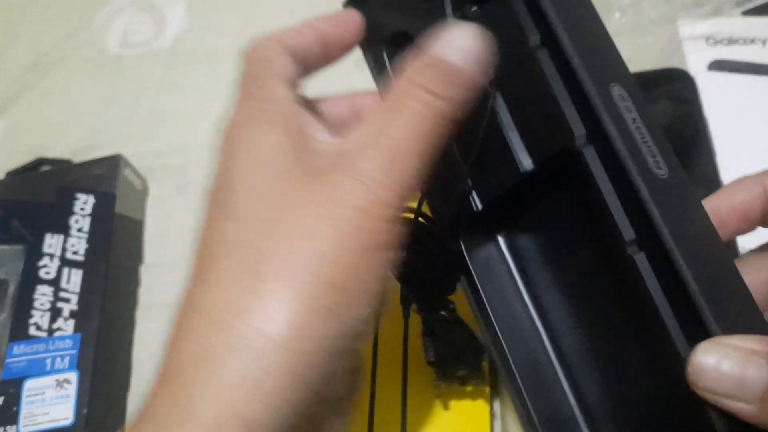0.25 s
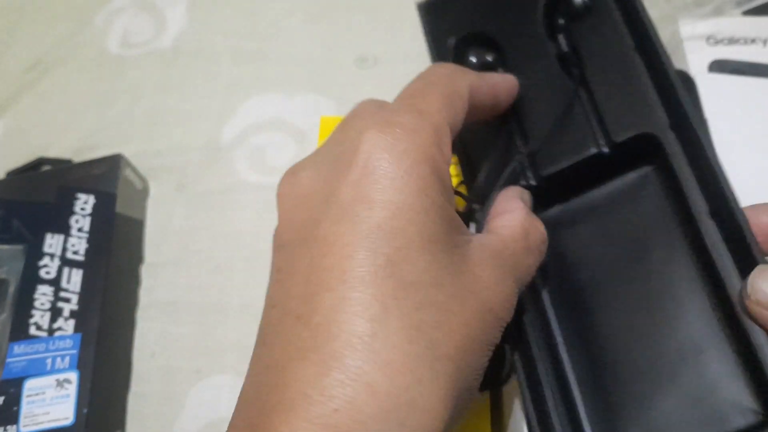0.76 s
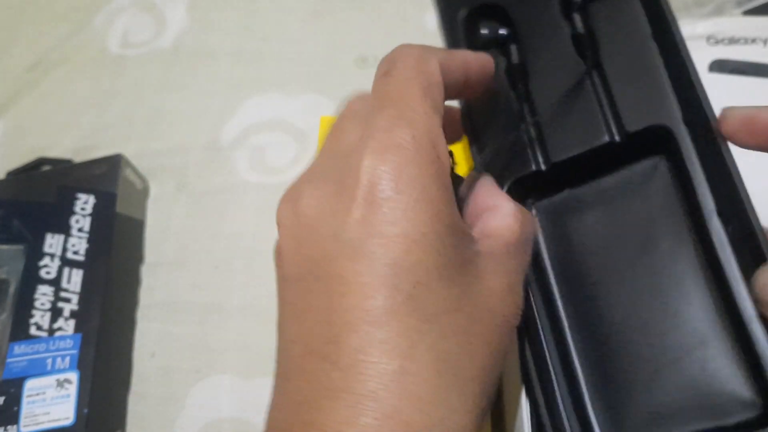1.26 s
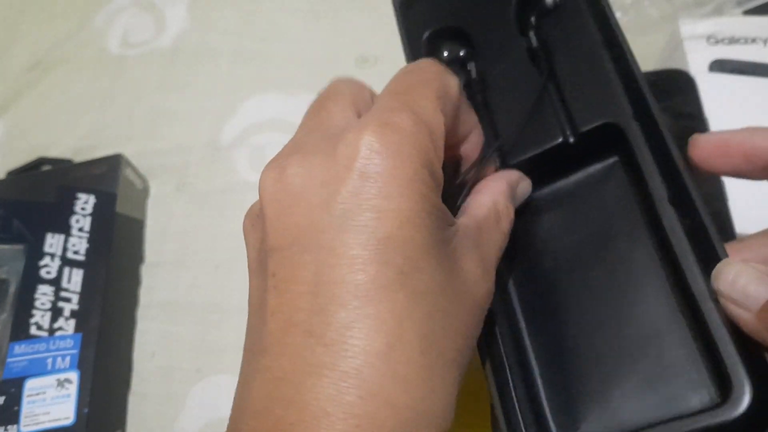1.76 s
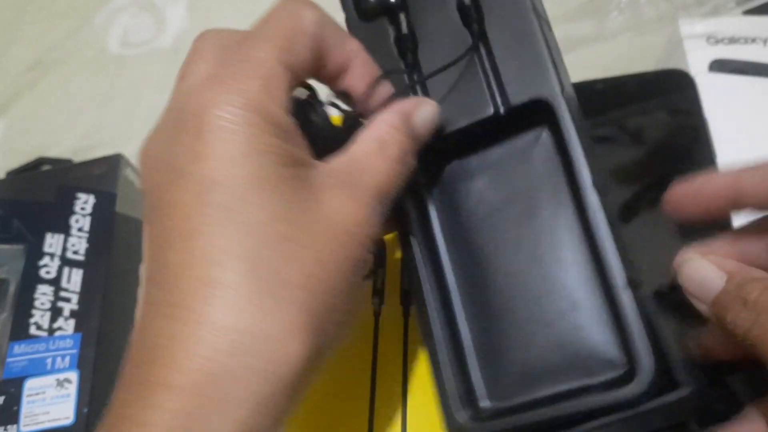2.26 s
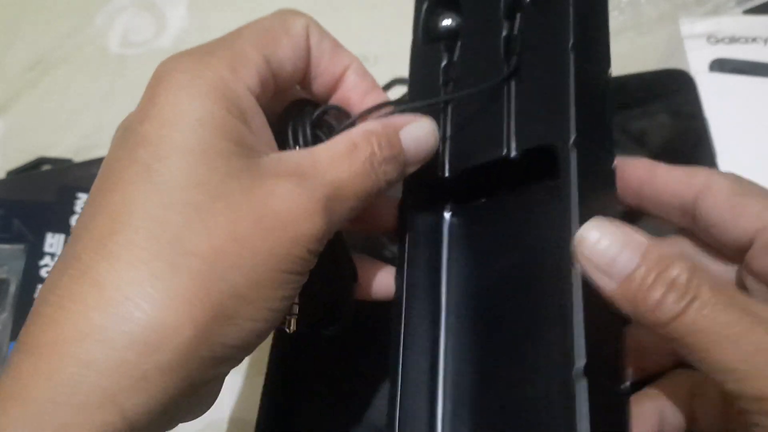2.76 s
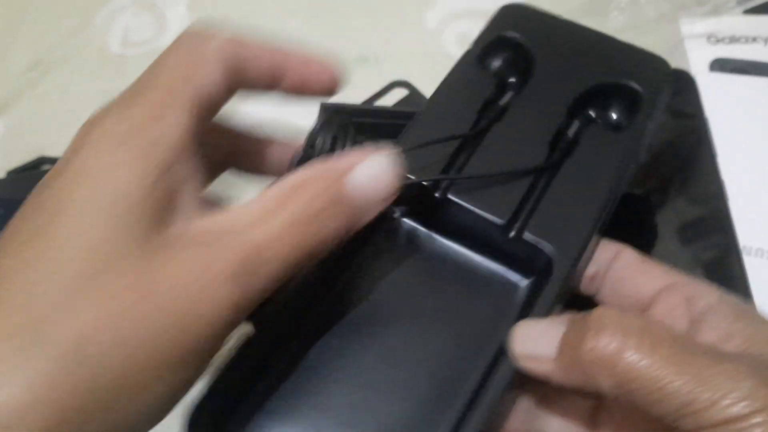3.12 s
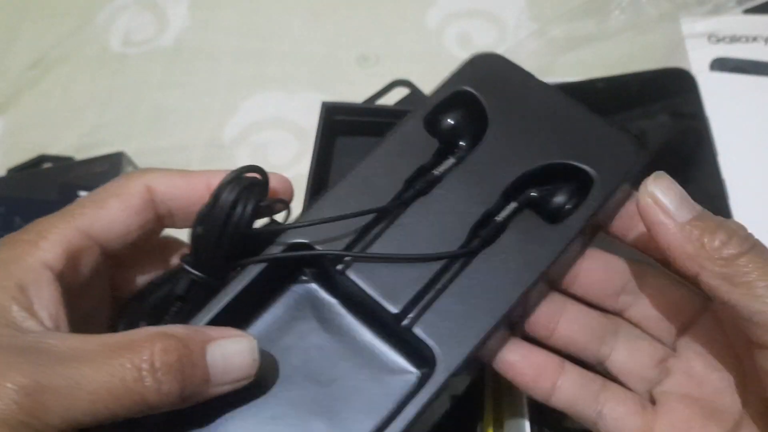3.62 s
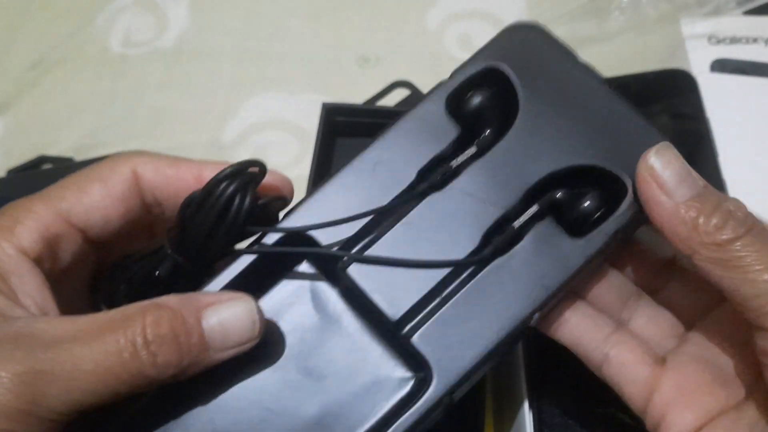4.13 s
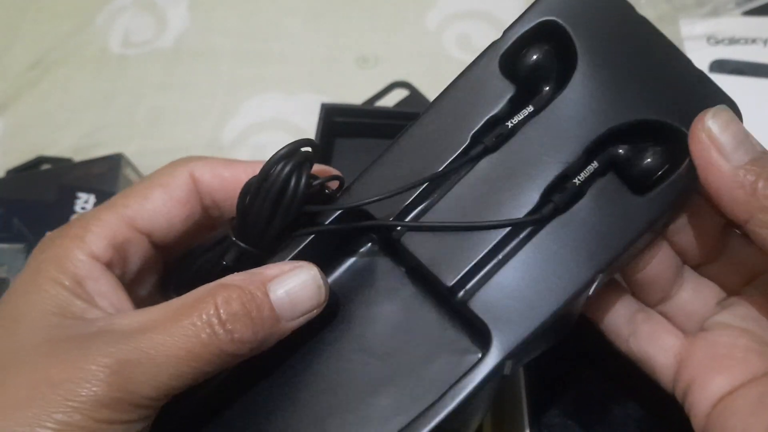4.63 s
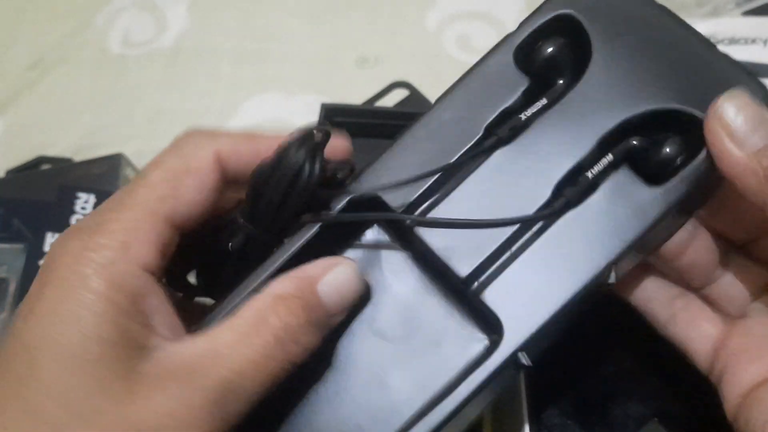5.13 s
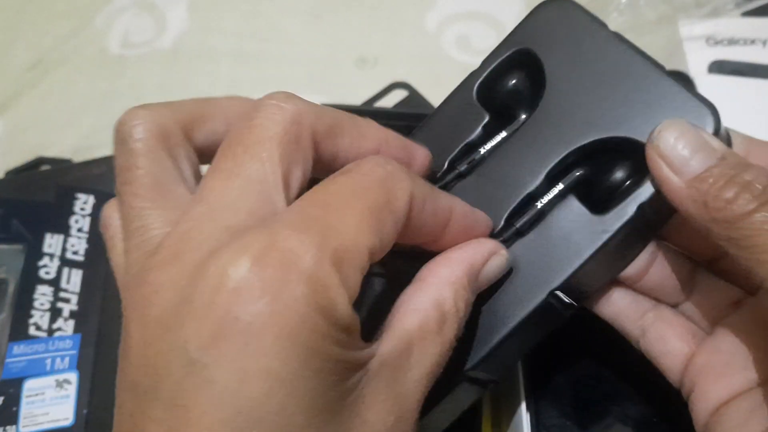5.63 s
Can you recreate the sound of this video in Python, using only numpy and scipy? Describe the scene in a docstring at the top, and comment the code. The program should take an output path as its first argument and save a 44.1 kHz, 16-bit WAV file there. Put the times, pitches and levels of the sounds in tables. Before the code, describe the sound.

Fingers and thin cable rub a hollow plastic insert above a box on a table. Light scuffs lead to a loud pop, a deeper thump, then a busy run of creaks, clicks and hollow knocks in the middle. After a sparse pause, one hard plastic snap sounds late, followed by fading small scrapes. Close stereo pickup, left of centre, very short room echo, faint steady background noise.

```python
"""Skin and cable rub a thin moulded plastic tray, which pops and snaps as two hands turn it above a cardboard box.
Rubbing is stick-slip noise ringing panel, ribs and box, with skin rasp and hiss on top; the panels ring
near 1 and 1.8 kHz. Pops and knocks are short rough pushes into the same resonances; the box booms under them.
Soft low thuds come through the table; a short room echo of the pops and faint steady noise lie behind."""
import sys
import numpy as np
from scipy import signal
from scipy.fft import rfft, irfft, next_fast_len
from scipy.io import wavfile
from scipy.ndimage import uniform_filter1d, map_coordinates

SR = 44100
rng = np.random.default_rng(int(sys.argv[2]) if len(sys.argv) > 2 else 0)


def wrap_up_sound(samples):
    """Save the sound to the file named by the first command line argument, as 16-bit audio."""
    columns = np.atleast_2d(samples).T
    # keep every value between -1 and 1, then stretch to whole-number steps
    tamed = np.clip(columns, -1, 1)
    steps = np.round(tamed * 32767).astype(np.int16)
    wavfile.write(sys.argv[1], SR, steps)


N = 259308

# Resonances of the tray's broad panel, its ribs and the box. Each row: pitch in Hz, width in Hz, strength in dB.
PANEL_MODES = [(867.4, 133.2, -5.5), (1002.5, 91.8, 0), (1079.3, 140.3, -1.5), (1228, 168.5, -7.5)]
RIB_MODES = [(1430, 209.6, -3.5), (1689.7, 102.2, -4), (1792.4, 170.4, -6), (2280.6, 307.7, -3.5),
             (2477.3, 837, -6.5)]
BOX_MODES = [(148, 46, -4), (299.1, 49.7, 5), (389.2, 73, 1), (494.5, 99, -0.5)]
# Where the tray is held. Each row: time in seconds, left over right in dB.
HAND_POSITIONS = [(0, 6.5), (.8, 3), (2.1, 2), (2.7, 4.5), (3.6, 5), (4.4, 8), (4.9, 7.5), (5.2, 6),
                  (5.88, 6.5)]


def amp(db):
    """Gain of a level in dB."""
    return 10 ** (np.asarray(db) / 20)


def unit(x):
    """Scale to rms 1."""
    return x / np.sqrt(np.mean(x ** 2) + 1e-20)


def peak_unit(x):
    """Scale so that the mean of the channels peaks at 1."""
    return x / np.max(np.abs(x.mean(axis=0)))


def along(points, hz):
    """Interpolate (Hz, value) points on a log frequency axis."""
    point_hz, values = np.transpose(points)
    return np.interp(np.log(hz + 1), np.log(point_hz + 1), values)


def filtered(x, response):
    """Multiply the spectrum of x by a complex response of frequency."""
    size = next_fast_len(x.shape[-1] + 8192)  # padding for the ringing
    spectrum = rfft(x, size) * response(np.fft.rfftfreq(size, 1 / SR))
    return irfft(spectrum, size)[..., :x.shape[-1]]


def colour(spectrum):
    """Gain of a (Hz, dB) spectrum."""
    return lambda hz: amp(along(spectrum, hz))


def sides(pan_db):
    """Gains of left and right for a left-over-right level in dB."""
    return amp(np.array([pan_db / 2, -pan_db / 2]).reshape(2, -1))


def modes(body, low_hz, high_hz, scatter_db=0, favoured_hz=0, lean_db=0):
    """Causal response of a body: band-limited resonances, scattered in strength and leaning to a favoured pitch."""
    hz, width_hz, db = np.transpose(body)[..., None]
    db = db + scatter_db * rng.standard_normal(db.shape)
    if favoured_hz:
        octaves_off = np.abs(np.log2(hz / favoured_hz))
        db = db - lean_db * np.tanh(7 * octaves_off)
    sign = (-1) ** np.arange(len(body))[:, None]
    edges = signal.butter(2, [low_hz, high_hz], "band", analog=True)

    def response(f):
        resonances = 1j * f * width_hz / (hz ** 2 - f ** 2 + 1j * f * width_hz)
        return signal.freqs(*edges, f)[1] * np.sum(sign * amp(db) * resonances, axis=0)

    return response


def ports(pair, lag_ms):
    """Two unrelated forces mixed to a left-right likeness that falls with frequency; left hears first by lag_ms."""
    # Left-right likeness. Each row: frequency in Hz, correlation from 0 to 1.
    likeness = [(100, .95), (500, .94), (1200, .92), (2500, .7), (5000, .45), (15000, .3)]

    def mix(hz):
        angle = np.arccos(np.clip(along(likeness, hz), 0, 1)) / 2
        return np.array([np.cos(angle), np.sin(angle)])

    def lead(hz):
        return np.exp(1j * np.pi * hz * lag_ms / 1000 * np.array([[1], [-1]]))

    mid, side = filtered(pair, mix)
    return filtered(np.array([mid + side, mid - side]), lead)


def pops():
    """Each buckling or knock is a short rough push that rings panel, ribs and box at new strengths."""
    # Each row: start in seconds, peaks of panel, ribs, crack and box in dB, contact in ms,
    # favoured pitches of panel, ribs and box in Hz.
    pop_rows = [(.077, -57.5, -58.5, -80.5, -49.5, 3.5, 888, 1800, 321.2),
                (.406, -45.5, -59.5, -67.5, -59.5, 3.4, 925, 1410, 536),
                (.508, -40, -50.5, -44.5, -60, 3.77, 873, 1570, 558),
                (.734, -50, -61, -52.5, -72.5, 8.5, 1000, 1340, 291),
                (0.768, -48.5, -58.5, -44, -81, 8.1, 1056, 2200, 315),
                (1, -50, -57, -70.5, -81.5, 5.6, 1062, 1367, 143),
                (1.281, -43, -50, -63, -63, 3.9, 905, 1330, 509),
                (1.307, -22.5, -33, -28, -36.5, 9, 847.2, 1746, 495),
                (1.322, -35, -40.5, -40, -50, 5.8, 900, 1450, 400),
                (1.387, -38.5, -37, -45.5, -59.5, 6.84, 870, 1765, 482),
                (1.708, -48.5, -46, -56, -71.5, 8, 1100, 1572, 560),
                (1.81, -40.5, -42.5, -46, -72, 7.5, 1099, 1300, 452),
                (1.85, -44.5, -44, -62.5, -82.5, 3.4, 960, 1350, 546),
                (1.953, -33.5, -36.5, -61.5, -54.5, 14, 988, 1335, 549),
                (2.008, -24, -23.5, -30.5, -19.5, 2.36, 870, 1296, 428),
                (2.064, -40, -43.5, -60.5, -64.5, 7.3, 1200, 1360, 164),
                (2.191, -37, -30.5, -36, -59.5, 3.2, 1062, 1910, 299),
                (2.276, -39, -43, -57, -71.5, 3.8, 1230, 1805, 307),
                (2.326, -40.5, -47.5, -52, -46, 4, 875, 1360, 476),
                (2.573, -42.5, -42, -55.5, -56, 3.6, 952, 1800, 283),
                (2.602, -36.5, -34, -43, -38, 4.8, 864.7, 1733, 292),
                (2.658, -32, -36.5, -32.5, -53.5, 5.5, 903, 1720, 272),
                (2.675, -33, -26, -23.5, -37.5, 5.47, 977, 1834, 500),
                (2.71, -42, -37.5, -43.5, -39, 4, 1120, 1350, 395.5),
                (2.728, -48, -50, -42.5, -43.5, 3.6, 1000, 1700, 300),
                (2.742, -34, -21.5, -31.5, -24.5, 4.48, 866, 1604, 331.5),
                (2.756, -52, -52, -41.5, -36, 5.3, 845, 1510, 165),
                (2.795, -29, -32.5, -43, -32.5, 2.2, 892, 1536, 514.6),
                (2.852, -58.5, -53.5, -65.5, -47, 4, 877, 1618, 326),
                (2.905, -47, -45, -44.5, -50.5, 4.45, 1010, 1870, 490),
                (3.095, -26, -23, -16.5, -68, 3.8, 1225, 1796, 310),
                (3.128, -43.5, -34, -44.5, -47.5, 5.2, 1170, 1800, 277),
                (3.146, -33, -48.5, -33.5, -43.5, 6.15, 1250, 1500, 334.3),
                (3.177, -34.5, -34, -30.5, -55.5, 9.74, 1134, 1915, 274),
                (3.285, -51.5, -48.5, -54.5, -70, 2.5, 930, 1520, 390),
                (3.359, -49, -38, -37, -76.5, 4.36, 1152, 1828, 326),
                (3.479, -27, -42, -29, -62.5, 5.4, 1163, 1370, 560),
                (3.487, -36, -37, -52.5, -52.5, 3.85, 1136, 1440, 322),
                (3.534, -37, -55, -44.5, -59.5, 3.2, 1183, 1810, 441),
                (3.81, -45.5, -46, -46.5, -61.5, 3.4, 981, 1490, 396),
                (3.863, -38, -37.5, -52.5, -55, 1.95, 1185, 1800, 289),
                (4.098, -47.5, -49, -60, -57, 14.5, 1096, 1410, 340),
                (4.193, -54.5, -51.5, -46.5, -80.5, 10, 1080, 2196, 336.6),
                (4.313, -51, -66, -67, -71.5, 4, 1056, 1350, 312),
                (4.471, -55.5, -59, -76, -76, 4, 1010, 1400, 150.5),
                (4.835, -21, -18.5, -57, -31, 2.93, 1082, 1442, 274),
                (4.84, -20.5, -17.5, -36, -51.5, 2.9, 1020, 1470, 210),
                (4.851, -39, -32.5, -60.5, -62, 4.85, 1280, 1377, 443.4),
                (5.042, -52.5, -57, -66.5, -76, 4.7, 1066, 1451, 471),
                (5.085, -41, -48.5, -51.5, -78, 12, 986.5, 1587, 320.8),
                (5.182, -56.5, -55, -65.5, -77, 4.2, 1020, 2010, 318),
                (5.212, -45, -48.5, -46.5, -70, 5.45, 970, 1460, 560),
                (5.224, -33, -41, -50, -67, 2.23, 1177, 1431, 296.6),
                (5.281, -49, -61, -65, -84, 4.33, 1230, 1370, 320.5),
                (5.361, -43, -42, -42.5, -62, 8.95, 1117, 1488, 338),
                (5.396, -47.5, -40.5, -41, -49.5, 16.8, 1230, 1478, 304),
                (5.419, -64, -45.5, -44, -54.5, 11, 1190, 1607, 302.7),
                (5.521, -61, -59.5, -68, -83, 5.5, 1179, 1538, 145),
                (5.566, -61.5, -45.5, -56, -66, 5.2, 1310, 1463, 317),
                (5.715, -55.5, -50, -76.5, -56.5, 13.8, 1080, 1460, 262),
                (5.829, -58, -47, -53.5, -77.5, 5.03, 1026, 1507, 301.3)]
    # Colour of the crack. Each row: frequency in Hz, density in dB per Hz.
    crack_colour = [(1650, -47), (2800, -10.5), (3480, 0.5), (4000, -4), (4500, -0.5), (5050, -4.5),
                    (9260, -15.5), (12200, -14), (16000, -29.5)]
    extra_pan_db = 2  # further to the left than the rubbing
    out, t = np.zeros((2, N + SR)), np.arange(SR // 10) / SR
    for start_s, panel_db, ribs_db, crack_db, box_db, contact_ms, panel_hz, ribs_hz, box_hz in pop_rows:
        pan_db = np.interp(start_s, *np.transpose(HAND_POSITIONS)) + extra_pan_db
        contact_s = np.clip(contact_ms, .3, 30) / 1000
        # a hard first touch on top of a rough push while the wall buckles
        envelope = np.exp(-(t / contact_s) ** 1.455) + 3 * np.exp(-t / 0.000186)
        push = ports(envelope * rng.standard_normal((2, len(t))), lag_ms=0.0745)

        panel = filtered(push, modes(PANEL_MODES, 700, 1900, 3.0, panel_hz, lean_db=16.0))
        ribs = filtered(push, modes(RIB_MODES, 1250, 3200, 2.1, ribs_hz, lean_db=15))
        crack = filtered(push * np.exp(-t / 0.058), colour(crack_colour))
        # long waves reach both ports alike: one channel
        box = filtered(push[:1], modes(BOX_MODES, 120, 700, 3.44, box_hz, lean_db=15.5))

        tray = amp(panel_db) * peak_unit(panel) + amp(ribs_db) * peak_unit(ribs)
        tray += amp(crack_db) * peak_unit(crack)
        boom = amp(box_db) * peak_unit(box)
        out[:, round(start_s * SR):][:, :len(t)] += sides(pan_db) * tray + sides(0.5 * pan_db) * boom
    return out[:, :N]


def rubbing():
    """One sliding force rings panel, ribs and box; a second one makes the skin's rasp and hiss."""
    # Colours of the skin. Each row: frequency in Hz, density in dB per Hz.
    rasp_colour = [(1590, -40.5), (2700, -9.5), (3570, -0.5), (4240, -0.5), (4650, -1.5), (4990, -3),
                   (5470, -5), (6500, -14.5), (8450, -26.5), (14300, -120)]
    hiss_colour = [(3820, -15.5), (6500, -3), (8400, -4.5), (13400, -3.5), (15500, -11.5), (16000, -50.5)]
    on_panel, on_ribs, on_rasp, on_hiss, on_box = strokes()
    pan_db = np.interp(np.arange(N) / SR, *np.transpose(HAND_POSITIONS))

    force = ports(friction(ticks_db=2, swell_db=2.02, patchy_db=3.0), lag_ms=0.063)
    panel = on_panel * unit(filtered(force, modes(PANEL_MODES, 570, 1540)))
    ribs = on_ribs * unit(filtered(force, modes(RIB_MODES, 1437.5, 2499)))
    box = on_box * unit(filtered(force, modes(BOX_MODES, 96, 630)))

    skin = ports(friction(ticks_db=2.0, swell_db=2.5, patchy_db=3.5), lag_ms=0.061)
    rasp = on_rasp * unit(filtered(skin, colour(rasp_colour)))
    hiss = on_hiss * unit(filtered(skin, colour(hiss_colour)))
    return sides(pan_db) * (panel + ribs + rasp + hiss) + sides(1.523 * pan_db) * box


def strokes():
    """Gains of panel, ribs, rasp, hiss and box: each stroke presses up to its peak, fades and lifts off."""
    # Each row: start, strongest and end in seconds, panel level in dB, fade until the end in dB,
    # then levels of ribs, rasp, hiss and box over the panel in dB.
    stroke_rows = [(0, -0, 0.0766, -64.5, 17.5, 0.5, -7.5, -5.5, -5),
                   (0.081, .174, 0.2215, -67, 7.5, 7.5, -6, 6.5, -5.5),
                   (0.169, 0.473, 0.5618, -54.5, 10, -2.5, -9, -4.5, -15.5),
                   (0.567, 0.642, 0.7005, -59.5, 8.5, 0.5, -1, 5.5, -15),
                   (0.7, .75, 0.865, -50.5, 6, -3.5, -7.5, -7, -26),
                   (0.854, 0.888, 0.9383, -49, 11, -5.5, -9.5, -12.5, -21),
                   (.94, .95, 0.994, -77, 3, -5.5, -11.5, -12, -3),
                   (.997, 0.99, 1.201, -62.5, 0.5, -9, -17, -21.5, -18),
                   (1.168, 1.222, 1.3035, -53, -1.5, -6.5, -17.5, -14, -27),
                   (1.285, 1.321, 1.4688, -44.5, 26, -3, -11, -8, -9.5),
                   (1.442, 1.467, 1.6364, -60.5, 11, 0, -9.5, -5.5, -14),
                   (1.637, 1.648, 1.87, -68, 0, -2, -8.5, -17.5, -12),
                   (1.706, 1.716, 1.758, -67.5, 4.5, 0, 5, 8, -7.5),
                   (1.829, 1.82, 1.854, -56, 2, -3.5, -9, -16.5, -25),
                   (1.876, 1.921, 2.0375, -44.5, 3, -2.5, -7.5, -9, -22),
                   (2.018, 2.011, 2.1694, -42.5, 16, -1.5, -12.5, -15, -12.5),
                   (2.142, 2.198, 2.2443, -44.5, 4.5, 0, -9, -13, -13.5),
                   (2.251, 2.278, 2.341, -49, 3, -1.5, -10.5, -13, -9),
                   (2.307, 2.324, 2.445, -51, 8.5, -3, -9, -14.5, 0.5),
                   (2.404, 2.484, 2.593, -56.5, 3.5, 1, -4, -1, -15.5),
                   (2.569, 2.585, 2.761, -42, 4, 0, -8.5, -9, -7),
                   (2.633, 2.674, 2.72, -41.5, 12, 1.5, -8.5, -2.5, -4.5),
                   (2.703, 2.743, 2.823, -50, 14.5, -2.5, -3, -1.5, 9.5),
                   (2.829, 2.876, 2.89, -61, 2, -5, -14.5, -15.5, -1.5),
                   (2.905, 2.913, 2.963, -52, 3, -1, -8, -8.5, 1),
                   (2.94, 2.986, 3.164, -64.5, 0, -0.5, -4, -2, -16),
                   (3.088, 3.096, 3.198, -40.5, 13.5, -0.5, -4.5, -9, -13.5),
                   (3.172, 3.179, 3.284, -52, 15.5, -2.5, -3.5, -11.5, -11),
                   (3.271, 3.28, 3.42, -61.5, 2.5, -0.5, -5.5, -12.5, -8),
                   (3.399, 3.531, 3.4955, -51.5, -7, -2, -2, -0.5, -10.5),
                   (3.51, 3.544, 3.7475, -50, 9.5, 1.5, 1, 3, -14),
                   (3.792, 3.831, 3.899, -48, 2.5, 0, -3, -5, -19.5),
                   (3.91, 4.009, 4.342, -59.5, 12, 0, -3, -5, -14.5),
                   (4.356, 4.485, 4.638, -66, 4.5, -6, -12.5, -11, -14),
                   (4.61, 4.648, 4.854, -66.5, 8, -0.5, -5, -6, -15.5),
                   (4.831, 4.857, 4.953, -48.5, 20, -2, -12.5, -18.5, -6),
                   (5.051, 5.1, 5.197, -55.5, 5, -2.5, -6, -11.5, -19),
                   (5.191, 5.226, 5.357, -53, 26.5, -2.5, -7.5, -6.5, -19),
                   (5.359, 5.364, 5.39, -56, 5.5, -2, -4, -12.5, -22.5),
                   (5.383, 5.41, 5.437, -56.5, 6, 0.5, -2, -6, -4.5),
                   (5.427, 5.449, 5.61, -76.5, 9, -1, -12.5, -8.5, 2.5),
                   (5.564, 5.57, 5.687, -70, 1.5, 9, -1.5, -0.5, -10.5),
                   (5.728, 5.729, 5.92, -65.5, 1.5, -2, -12, -13, -13)]
    # How steeply panel, ribs, rasp, hiss and box follow the force: one exponent a row.
    steepness = np.array([[1.01], [1.05], [1.2], [1.25], [.9]])
    touch = 0.13  # share of the force at first touch
    release_db_per_s = 699.5  # after lift-off, before steepness
    t, power = np.arange(N) / SR, np.zeros((5, N))
    for start_s, top_s, end_s, panel_db, fade_db, *over_db in stroke_rows:
        rise = np.interp(t, [start_s - .003, start_s, max(top_s, start_s + .001)], [0, touch, 1])
        fall_db = np.interp(t, [top_s, max(end_s, top_s + .001)], [0, fade_db])
        fall_db += release_db_per_s * np.maximum(t - end_s, 0)
        force = rise * amp(-fall_db)
        levels = amp(panel_db + np.array([0, *over_db]))[:, None]
        power += (levels * force ** steepness) ** 2
    return np.sqrt(power)


def friction(ticks_db, swell_db, patchy_db):
    """Stick-slip force: noise that jumps at each slip and sinks back, its strongest pitches drifting."""
    z = signal.stft(rng.standard_normal((2, N)), nperseg=512)[2]
    # random field smoothed over frequency, then time
    field = uniform_filter1d(rng.standard_normal(z.shape[1:]), size=3, axis=0)
    field = uniform_filter1d(field, size=12, axis=1)
    noise = signal.istft(z * amp(patchy_db * unit(field)), nperseg=512)[1][:, :N]
    slips = (rng.random(N) < 110 / SR) * rng.exponential(size=N)  # 110 a second on average
    jumps = signal.lfilter([1], [1, -np.exp(-1 / (0.0049 * SR))], slips)  # each sinks back in 4.9 ms
    return amp(ticks_db * np.minimum(jumps, 4) + swell_db * wobble(30)) * noise


def wobble(rate):
    """Smooth random curve with rate knots a second."""
    knots = rng.standard_normal(int(N * rate / SR) + 4)
    return map_coordinates(knots, [np.arange(N) * rate / SR])


def room(x):
    """Echo by convolution with noise in which each frequency dies at its own speed."""
    # Decay of the room. Each row: frequency in Hz, time to die by 60 dB in seconds.
    decay_times = [(200, 0.093), (1000, 0.049), (4000, 0.05), (12000, 0.055)]
    hz, t, z = signal.stft(rng.standard_normal((2, SR // 3)), SR, nperseg=256)
    decay_db = -60 * t / along(decay_times, hz)[:, None]
    tail = signal.istft(z * amp(decay_db), SR, nperseg=256)[1]
    delayed = np.pad(x, (200, 0))  # samples
    return signal.fftconvolve(delayed[None], tail / np.linalg.norm(tail[0]), axes=1)[:, :N]


def table():
    """Weight shifting on the table: low thuds, almost alike at both ports, swell and die over a steady rest."""
    # Each row: time of peak in seconds, peak level in dB, time to die by 20 dB in seconds.
    thud_rows = [(.47, -73.5, 0.25), (1.27, -65, 0.13), (1.32, -52, 0.0576), (2.04, -41.5, 0.0414),
                 (2.33, -59.5, 0.1631), (2.6, -67.5, .1), (2.72, -57, 0.083), (2.8, -46, 0.0513),
                 (2.92, -64.5, 0.01), (3.14, -71, 0.1), (3.42, -77.5, 0.01), (3.631, -75.5, 0.31),
                 (4.612, -57.5, 0.006), (4.849, -72, 0.02), (5.41, -73, 0.13), (5.73, -70.5, 0.09)]
    # Colour of a thud. Each row: frequency in Hz, density in dB per Hz.
    thud_colour = [(12, -21.5), (20, -11), (108, 1.5), (150, -7), (200, -21), (330, -120)]
    rise_over_decay, rest_db = .8, -78.5  # swell time over decay time; steady level
    t, level = np.arange(N) / SR, amp(rest_db)
    for peak_s, peak_db, decay_s in thud_rows:
        distance_s = np.maximum((peak_s - t) / rise_over_decay, t - peak_s)
        level = level + amp(peak_db - 20 * distance_s / decay_s)
    noise = rng.standard_normal(N) + .3 * rng.standard_normal((2, N))  # shared part + own part
    return level * unit(filtered(noise, colour(thud_colour)))


def air():
    """Faint steady coloured noise of room and microphone."""
    # Each row: frequency in Hz, density in dB per Hz.
    air_colour = [(15, -53), (25, -13), (92, -23), (217, -58.5), (326, -3.5), (607, -19), (1040, 2.5),
                  (1890, -8.5), (3080, -19.5), (4030, -13.5), (8140, -14), (11900, -15.5), (16000, -29.5)]
    noise = ports(rng.standard_normal((2, N)), lag_ms=0)
    return amp(-77.5) * unit(filtered(noise, colour(air_colour)))


def scene():
    """Sum pops, rubbing, room echo of the pops, table and air, each panned left over right in dB."""
    blows = pops()
    tray = blows + rubbing()
    echo = amp(-10) * sides(4) * room(blows.mean(axis=0))
    return tray + echo + sides(3.36) * table() + sides(3.5) * air()


def record(dry):
    """Band limit: nothing passes from 15.9 kHz up."""
    return filtered(dry, lambda hz: hz < 15900)


dry = scene()
out = record(dry)
wrap_up_sound(out)
```